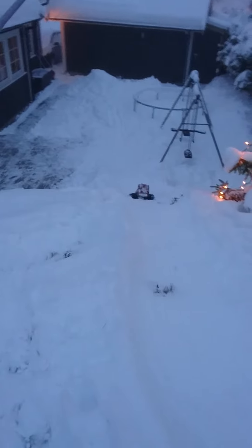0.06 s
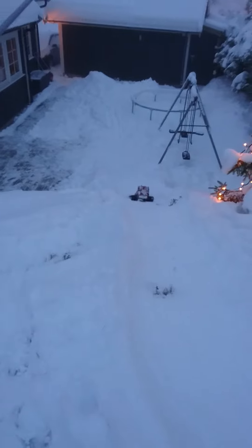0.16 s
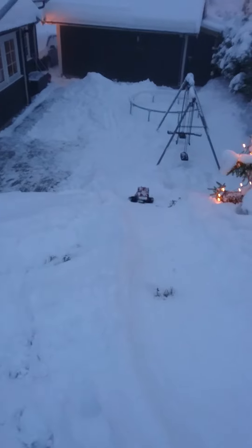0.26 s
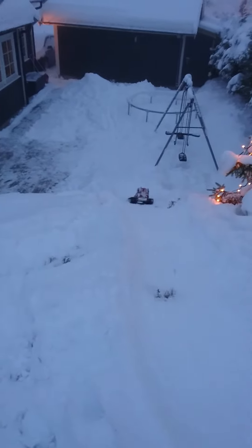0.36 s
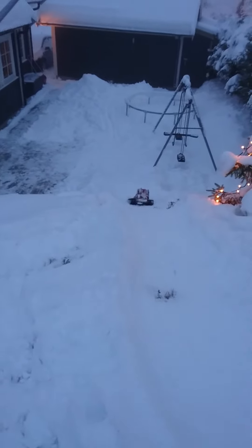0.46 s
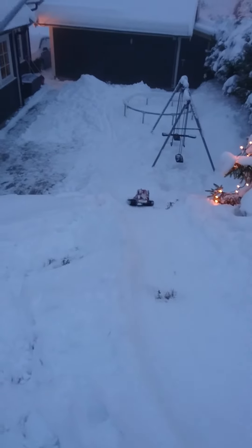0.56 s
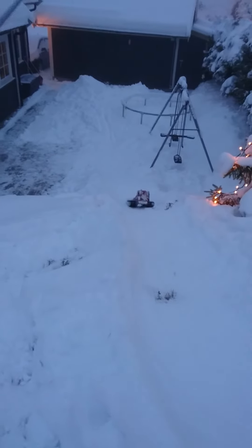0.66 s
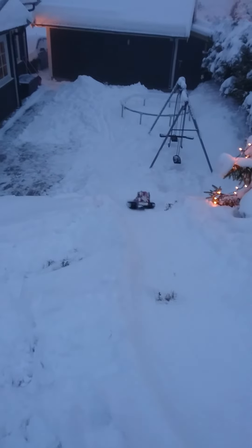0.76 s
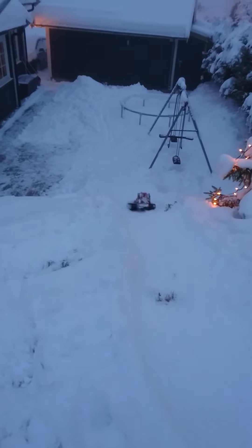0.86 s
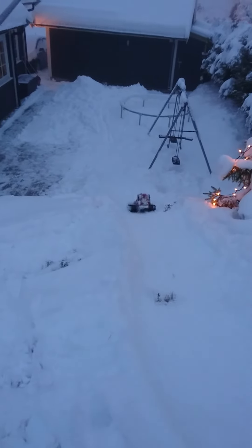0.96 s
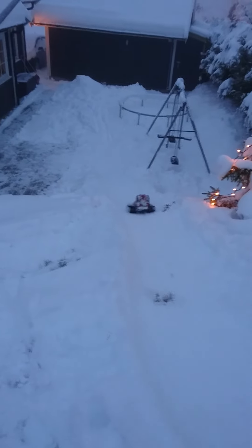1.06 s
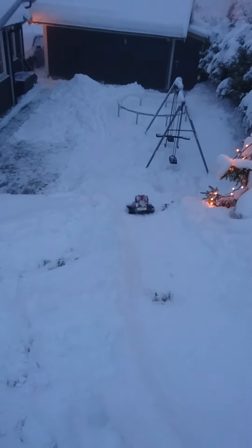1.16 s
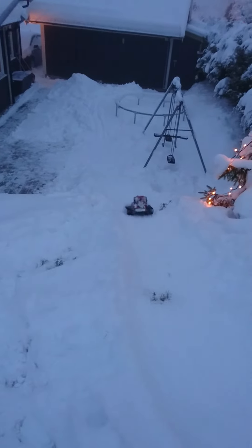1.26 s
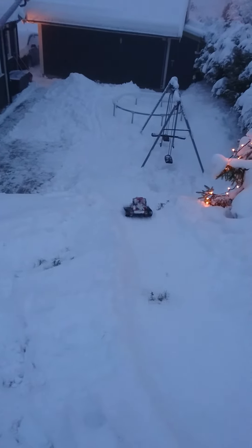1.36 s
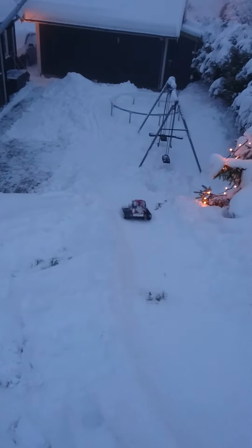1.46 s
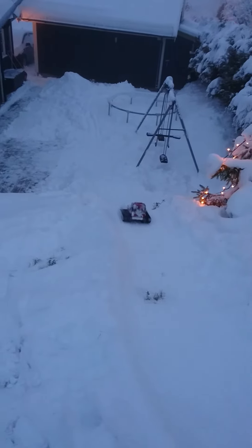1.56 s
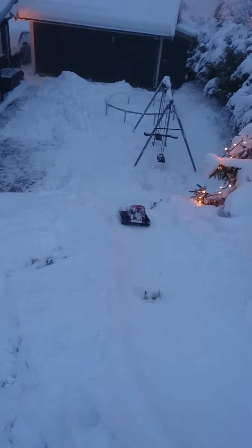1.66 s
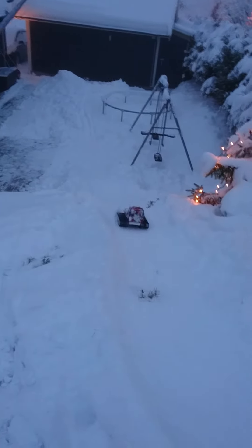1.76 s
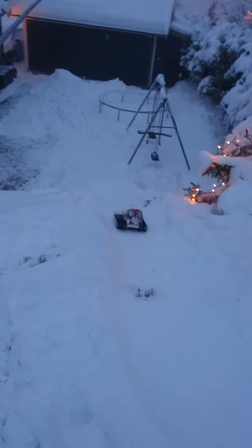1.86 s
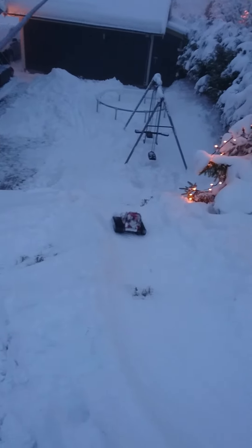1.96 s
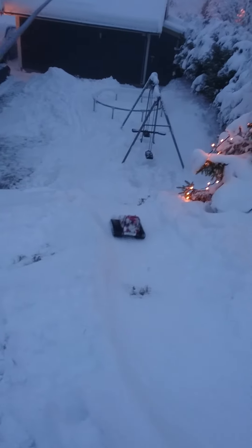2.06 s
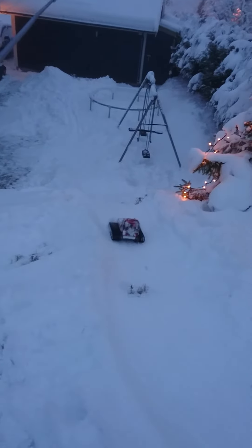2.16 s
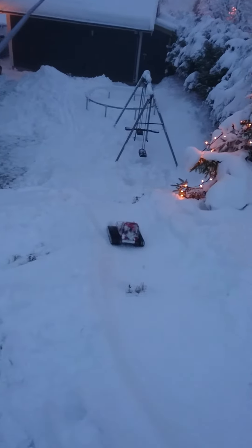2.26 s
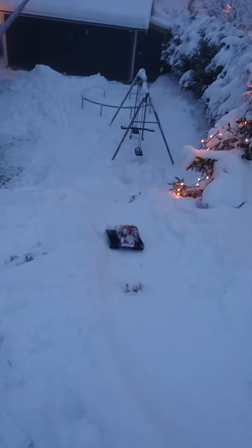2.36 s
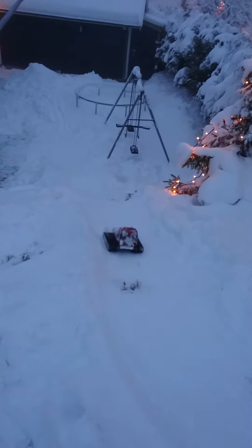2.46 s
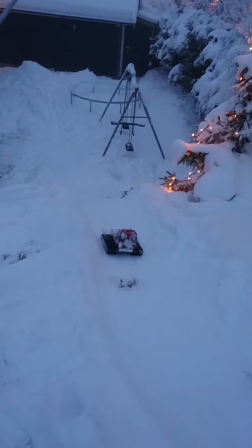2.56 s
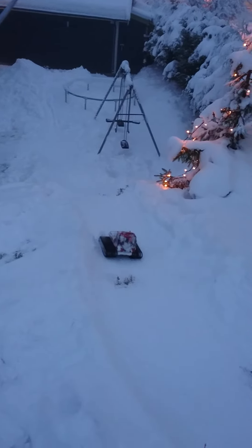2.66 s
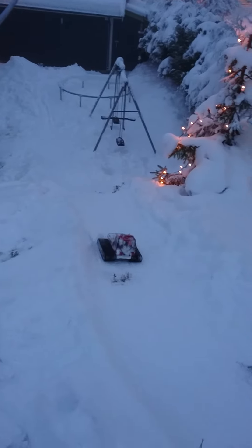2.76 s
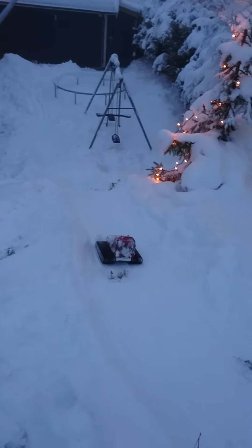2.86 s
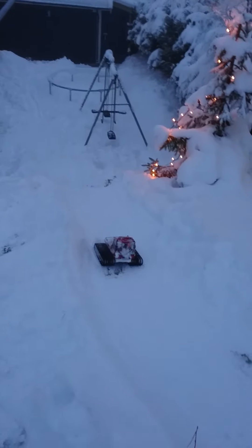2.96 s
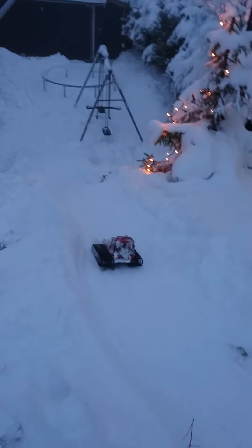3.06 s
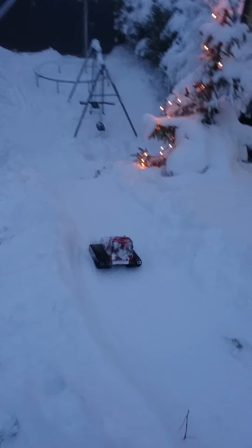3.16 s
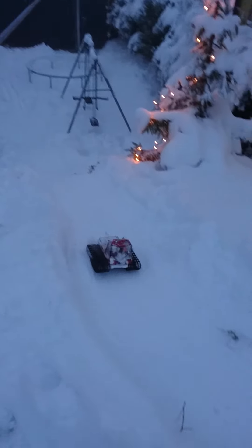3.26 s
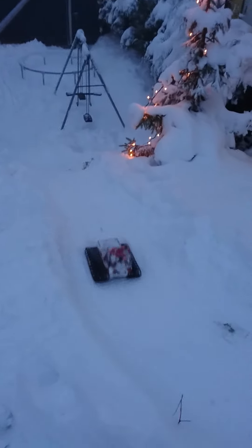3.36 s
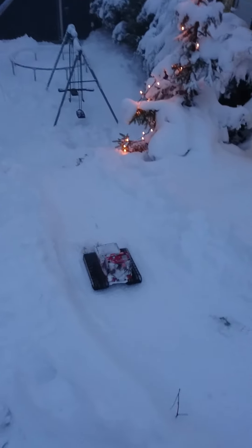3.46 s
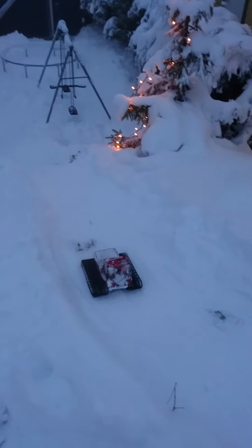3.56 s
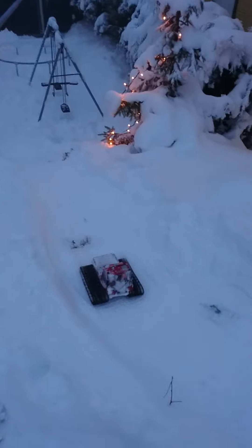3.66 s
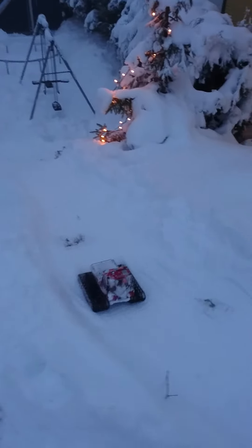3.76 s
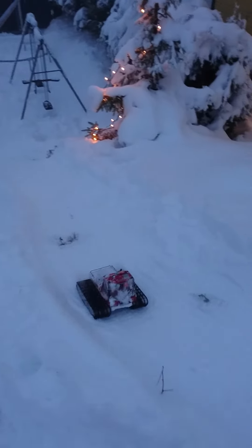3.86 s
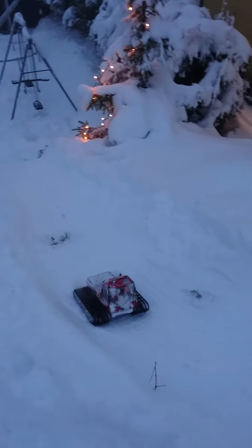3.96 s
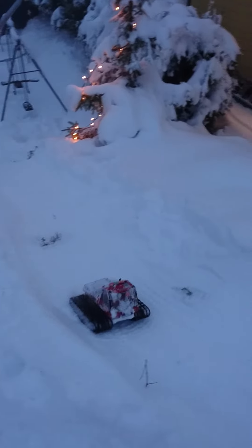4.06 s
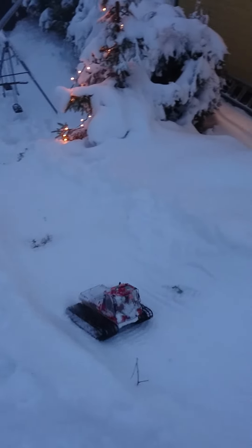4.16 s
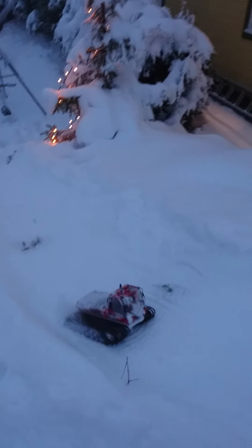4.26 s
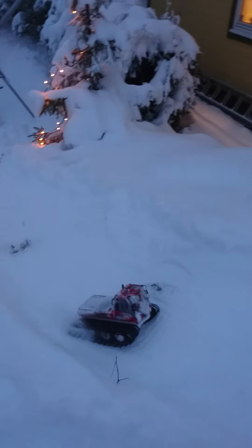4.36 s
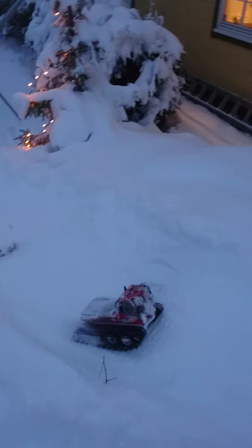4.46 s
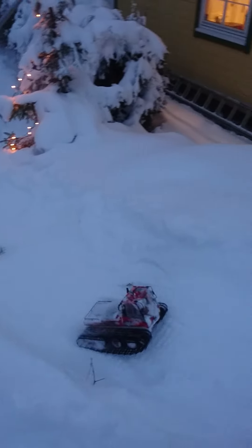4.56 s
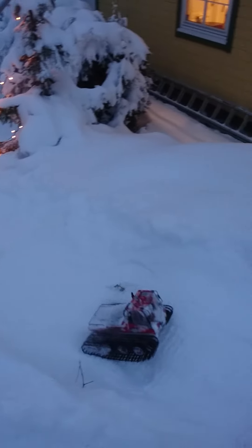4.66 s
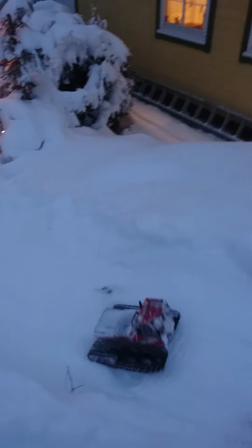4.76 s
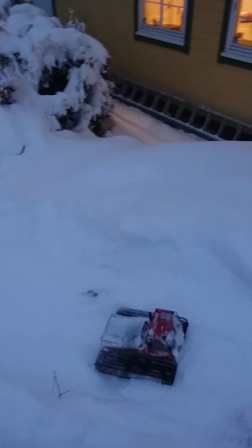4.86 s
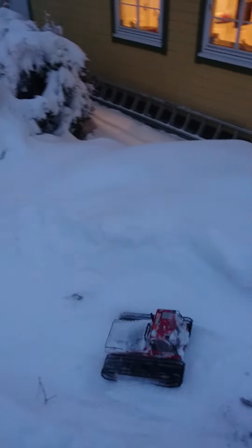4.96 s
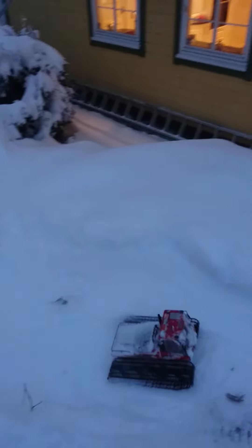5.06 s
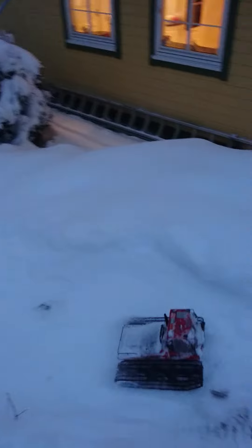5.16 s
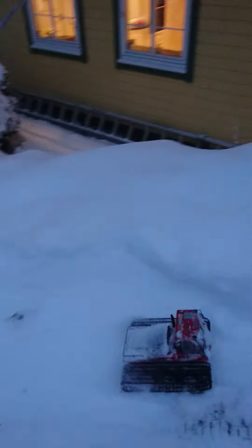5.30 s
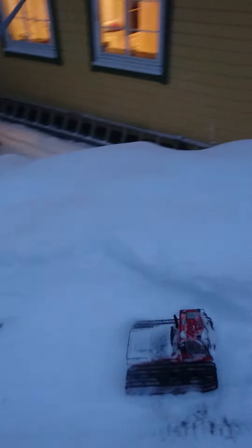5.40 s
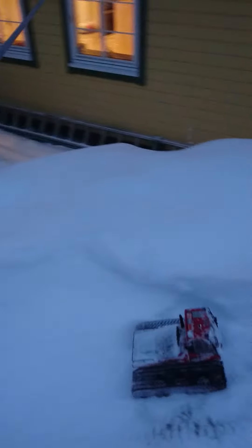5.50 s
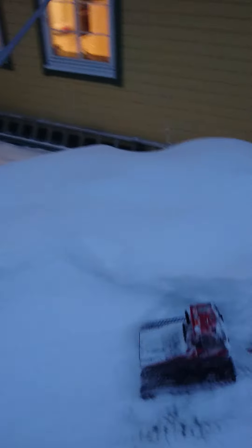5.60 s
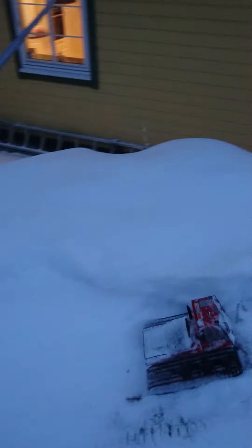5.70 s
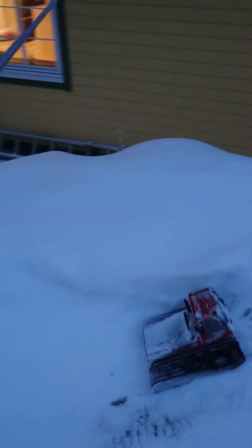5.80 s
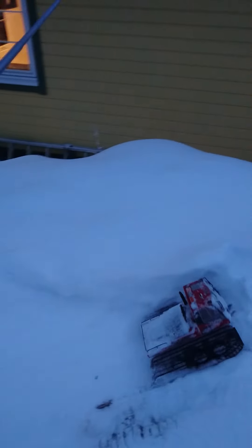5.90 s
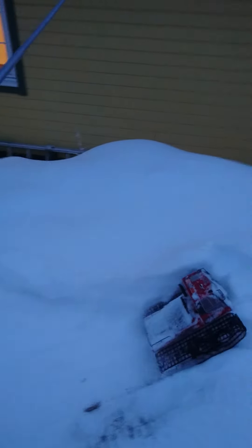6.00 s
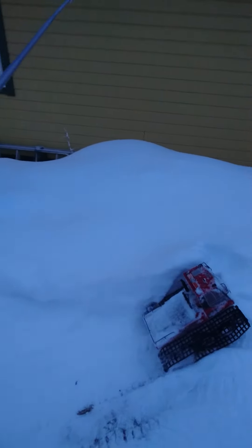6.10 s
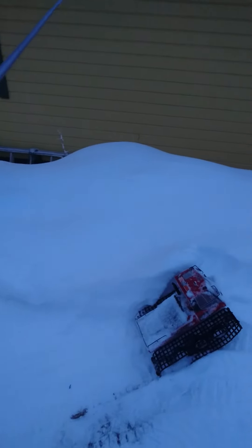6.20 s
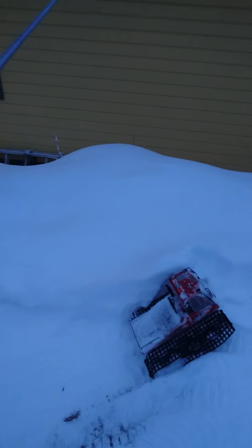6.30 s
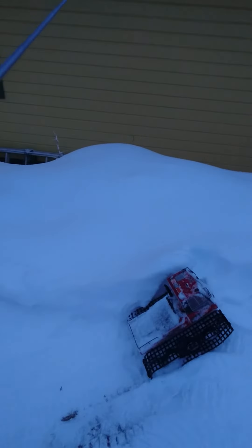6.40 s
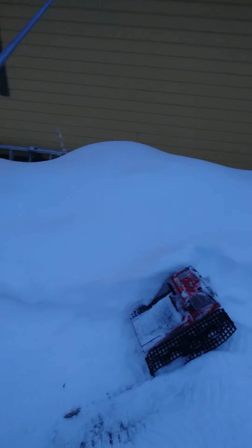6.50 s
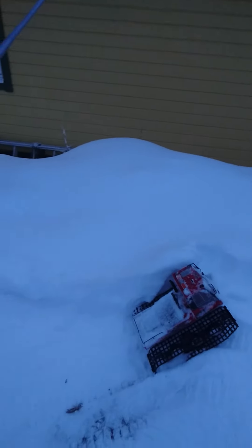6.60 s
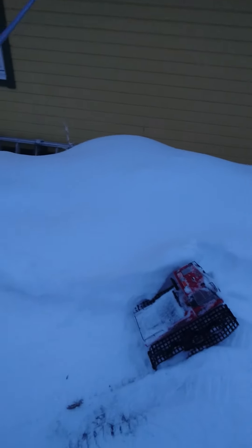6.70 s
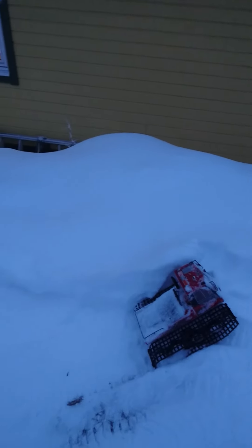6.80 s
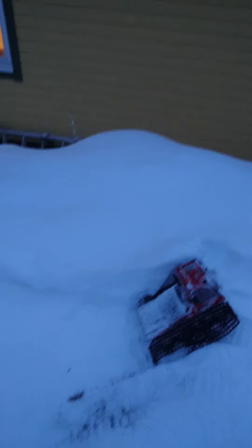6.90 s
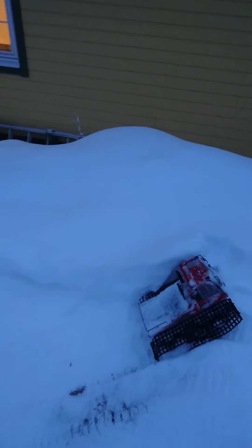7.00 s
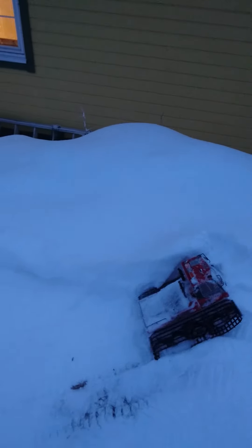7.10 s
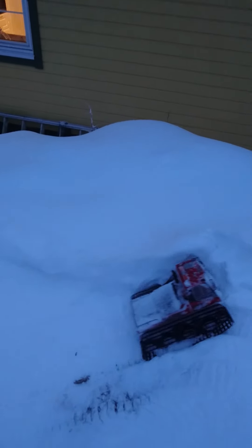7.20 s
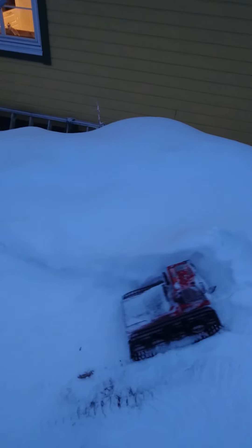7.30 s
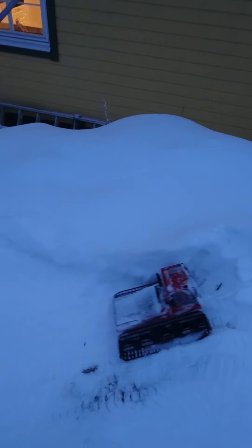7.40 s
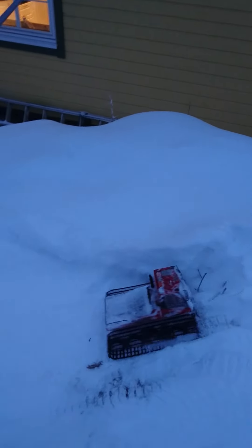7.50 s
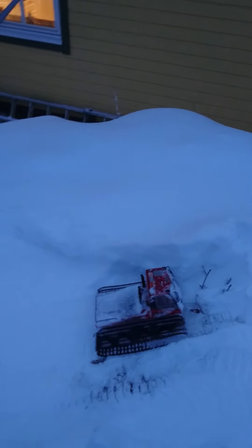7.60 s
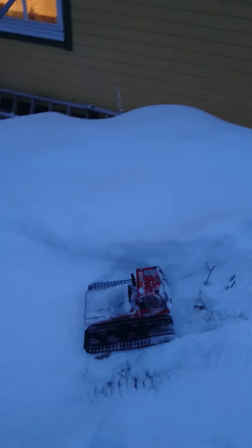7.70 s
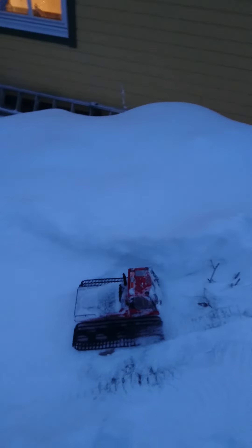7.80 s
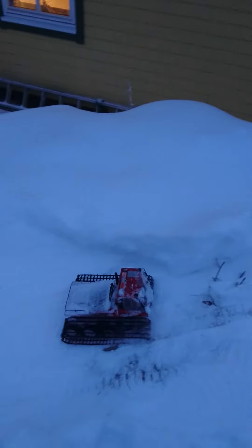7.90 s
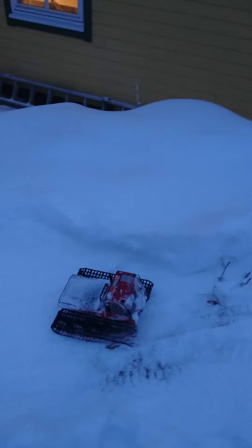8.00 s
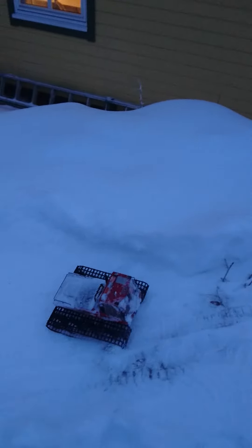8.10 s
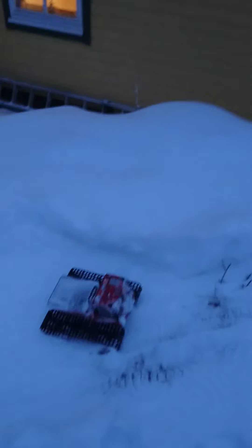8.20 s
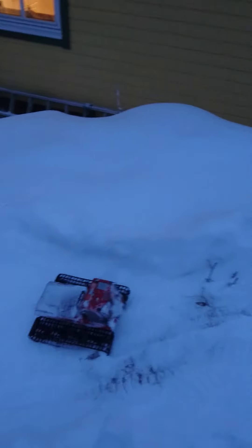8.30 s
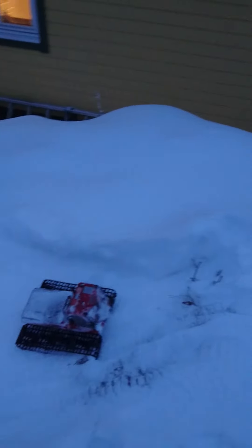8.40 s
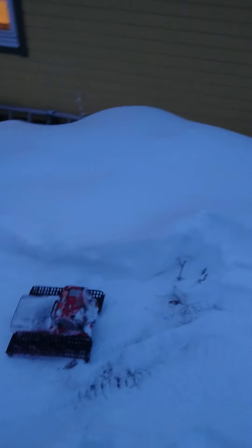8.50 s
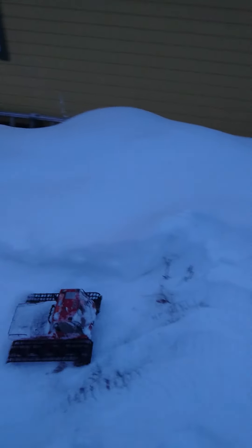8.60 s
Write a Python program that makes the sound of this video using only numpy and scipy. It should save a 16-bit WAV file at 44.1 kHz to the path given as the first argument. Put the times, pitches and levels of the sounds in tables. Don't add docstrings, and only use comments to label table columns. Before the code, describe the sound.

A handheld stereo microphone in open snowy air catches a toy-sized tracked vehicle coming nearer. Its shrill motor whine trembles and bends with effort over fine track chatter, strongest just before a sudden downward stall. Bumps and soft hiss fill the pause. A lower reversing whirr follows, buzzing and crackling with ice, slows to a halt, then a tiny restart ends it. Gloved knocks and scrapes are close and bassy throughout.

```python
import sys
import numpy as np
from scipy import signal
from scipy.fft import rfft, irfft, next_fast_len
from scipy.io import wavfile
from scipy.ndimage import uniform_filter1d, map_coordinates

SR = 44100
rng = np.random.default_rng(int(sys.argv[2]) if len(sys.argv) > 2 else 0)


def decibels_to_gain(level_db):
    exponent = np.asarray(level_db, float) / 20
    return 10 ** exponent


def transcribe(u):
    v = np.clip(np.atleast_2d(u).T, -1, 1)
    q = np.round(v * 32767).astype(np.int16)
    wavfile.write(sys.argv[1], SR, q)


N = 381465
TIME = np.arange(N) / SR


def rms_one(x):
    return x / np.sqrt(np.mean(np.abs(x) ** 2) + 1e-20)


def in_time(rows):
    s, *columns = np.transpose(rows)
    return [np.interp(TIME, s, c) for c in columns]


def response_db(table, hz, left=None):
    table_hz, db = np.transpose(table)
    return np.interp(np.log(hz), np.log(table_hz), db, left=left)


def hump(start_s, length_s):
    return np.sin(np.pi * np.clip((TIME - start_s) / length_s, 0, 1))


def gate(on_s, off_s, fade_in_s, fade_out_s):
    return np.clip(np.minimum((TIME - on_s) / fade_in_s, (off_s - TIME) / fade_out_s), 0, 1)


def bandpass(x, low_hz, high_hz, run=signal.sosfiltfilt):
    return run(signal.butter(2, [low_hz, high_hz], "band", fs=SR, output="sos"), x)


def coloured(spectrum, low_hz=10, high_hz=22000, channels=2):
    size = next_fast_len(N)
    hz = np.maximum(np.fft.rfftfreq(size, 1 / SR), 1)
    edges = 1 / np.sqrt((1 + (low_hz / hz) ** 8) * (1 + (hz / high_hz) ** 8))
    bins = rfft(rng.standard_normal((channels, size)))
    return rms_one(irfft(bins * decibels_to_gain(response_db(spectrum, hz, -70)) * edges, size)[:, :N])


def drift(rate_hz):
    r = np.exp(-2 * np.pi * rate_hz / SR)
    return rms_one(signal.lfilter([1], [1, -2 * r, r * r], rng.standard_normal(N + SR))[SR:])


def ring(clicks, hz, t60_s):
    r, w = decibels_to_gain(-60 / (t60_s * SR)), 2 * np.pi * hz / SR
    return signal.lfilter([0, np.sin(w)], [1, -2 * r * np.cos(w), r * r], clicks)


# t/s, f/Hz
CLIMB = [(0, 3420), (.54, 3364), (1.1, 3440), (1.17, 3310), (1.24, 3426), (1.5, 3540), (1.83, 3677),
         (2.14, 3630), (2.25, 3750), (2.75, 3695), (3.0, 3728), (3.3, 3598), (3.4, 3660), (3.52, 3740),
         (3.62, 3920), (3.71, 3717), (3.8, 3798), (3.9, 3740), (4.0, 3575), (4.11, 3360), (4.19, 3433),
         (4.25, 3270), (4.38, 3202), (4.45, 3343), (4.51, 3450), (4.6, 3533), (4.7, 3485), (4.74, 3353),
         (4.85, 3342), (4.92, 3558), (4.97, 3634), (5.02, 3617), (5.07, 3750), (5.125, 3508), (5.165, 3618),
         (5.33, 3615), (5.45, 3534), (5.55, 3457), (5.7, 3447), (5.86, 3420), (5.98, 3298), (6.04, 3202),
         (6.09, 3237)]
# t/s, load/dB, second multiple/dB
CLIMB_LOAD = [(0, -58.5, 2.5), (.2, -55.5, -4), (.33, -66, 6.5), (.44, -60, 3.5), (.52, -52.5, -6),
              (1.0, -49, -8), (1.42, -57, 1.5), (1.8, -54, -4), (2.6, -52, -5), (3.1, -50.5, 3),
              (3.22, -48.5, 0), (3.33, -60.5, 14), (3.42, -51.5, 3.5), (3.5, -44.5, -5.5), (3.619, -47, -8),
              (3.72, -42, -4), (3.85, -42.5, -7.5), (4.0, -42.5, -9), (4.2, -47.5, -2.5),
              (4.35, -51.5, 2.5), (4.46, -46.5, 1.5), (4.62, -45.5, 2.5), (4.7, -49, 6), (4.82, -46.5, 2.5),
              (4.89, -45.5, 3), (4.96, -35.5, -3), (5.04, -44, -3), (5.1, -34.5, -11), (5.14, -38, -4),
              (5.19, -32.5, -10.5), (5.33, -35.5, -7.5), (5.4, -39, -4.5), (5.7, -38, -4.5), (5.92, -40, 1),
              (6.05, -41, -10)]
# t/s, teeth f/Hz, load/dB, second multiple/dB, third multiple/dB
STALL = [(6.115, 3195, -44.5, -3, -10), (6.14, 2830, -42.5, 5, -18), (6.152, 2620, -43.5, 19, -18),
         (6.164, 2260, -48, 8, -10), (6.18, 1840, -40, -10, -18), (6.192, 1534, -50, 3, 0),
         (6.203, 1312, -60, 6, -1.5), (6.235, 850, -68, 10, -3)]
REVERSE = [(7.126, 450.2, -99, -3, 2), (7.19, 1950, -50, -11, -12), (7.204, 1918, -47, -10, -20),
           (7.221, 1655, -51, 5, -14), (7.243, 1423, -53.5, 12.5, -8), (7.266, 1625, -60.5, 11.5, -14),
           (7.298, 1930, -54.5, -5, -14), (7.308, 1991, -49, -20, 7), (7.328, 2079, -55.5, -7, -4),
           (7.36, 2085, -47.5, -14, -1.5)]
BACKING = [(7.398, 2170, -65, -3, 6), (7.44, 2120, -57, -8, 9), (7.481, 2168, -56, -12, -5),
           (7.545, 2290, -58, -8, -7), (7.642, 2186, -56, -12, -4), (7.7, 2215, -58, -10, -4),
           (7.77, 2304, -61, -8, 1), (7.83, 2136, -55.5, -18, -1.5), (7.9, 2145, -51, -3, -2)]
HALT = [(7.966, 2070, -49, -4, -9), (7.981, 1940, -43, -5.5, -15), (8.031, 1539, -47, 12, -8),
        (8.05, 1437, -52.5, 3, -8), (8.072, 1496, -49, 7.5, -11), (8.091, 1405, -54.5, 6, -4),
        (8.113, 1528, -49, 9, -6), (8.153, 1600, -49, 1, -8), (8.199, 1431, -59, 19, -8)]
STOP = [(8.22, 1200, -56, 8, -14), (8.236, 1036, -52, 21.6, -12), (8.252, 1025, -70, 12.5, -10),
        (8.269, 1032, -70, 18, -10), (8.289, 1000, -85, 8.7, -10)]
RESTART = [(8.6, 1960, -64, 2, -14), (8.606, 1990, -52.5, 0.5, -14), (8.63, 2064, -44, -3, -14),
           (8.638, 2140, -46, -13, -3), (8.65, 2250, -43.5, -8, -6)]
# t/s, share
SAG_EASES = [(3.45, 1), (4.9, 0.22), (6.1, 0.26)]
# t/s, distance/m
DISTANCE = [(0, 8.6), (.5, 8.1), (.8, 6.8), (1.25, 8.1), (1.8, 6.7), (2.6, 6.07), (2.9, 4.9), (3.35, 4.7),
            (3.7, 3.54), (4.2, 3.83), (5.0, 3.54), (6.1, 3.08), (7.3, 4.02), (8.2, 2.91), (8.65, 3.1)]
# f/Hz, level/dB
GEARBOX = [(1500, -0.5), (2150, -10.5), (3000, -2.5), (3900, 6), (5300, -17.5), (6300, 2.5), (7500, 3.5),
           (10300, -20.5)]


def drive():
    sprocket_teeth, tight_spot_turns = 433, 0.01
    sag, sag_sharpness, sag_db = 0.0105, 0.29, (0, 2, 0, 0)
    spin_up_s, creep_s = 0.023, 0.13
    third_db, fourth_db, light_load_db, loss_db_per_m = 9.5, -3, -4, 1.2

    bursts = (STALL, REVERSE + BACKING + HALT + STOP, RESTART)
    steady_hz, = in_time(CLIMB + [row[:2] for burst in bursts for row in burst])
    turn = 2 * np.pi * (np.cumsum(steady_hz) / SR / sprocket_teeth - tight_spot_turns)
    bind = np.cos(turn) + sag_sharpness * np.cos(2 * turn)
    bind = bind * in_time(SAG_EASES)[0] * decibels_to_gain(0.69 * drift(3.14))
    mesh_hz = steady_hz * (1 - sag * bind)

    loads = [(s, load, second, second) for s, load, second in CLIMB_LOAD]
    loads += [(s, *levels) for burst in bursts for s, _, *levels in burst]
    load_db, second_facing_db, third_facing_db = in_time(loads)

    starts = [0, REVERSE[0][0], RESTART[0][0]]
    stops = [STALL[-1][0], STOP[-1][0], N / SR]
    off_points, rest_points = [], []
    for a, b, last in zip(starts, stops, [-1, *stops]):
        off_points += [(a - spin_up_s, 1), (a, 0), (b, 0), (b + spin_up_s, 1)]
        rest_points += [(a - creep_s, a - creep_s - last), (a, 0), (b, 0)]
    off, = in_time(off_points)
    rest_s, = in_time(rest_points)

    loss_db = loss_db_per_m * in_time(DISTANCE)[0]
    backing_db = light_load_db * (TIME > STALL[0][0])
    shares_db = (0, second_facing_db, third_facing_db + third_db - loss_db, fourth_db - loss_db + backing_db)
    levels_db = []
    for k, (share_db, bind_db) in enumerate(zip(shares_db, sag_db), 1):
        radiated_db = response_db(GEARBOX, k * mesh_hz)
        levels_db.append(load_db + bind_db * bind + share_db - 50 * off + radiated_db)
    return 2 * np.pi * np.cumsum(mesh_hz) / SR, levels_db, np.log2(steady_hz / 3500), rest_s


PINION_TEETH, WHEEL_TEETH = 17, 43
# t/s, share
ROUGHNESS = [(0, .7), (1.2, .75), (2.0, 1.2), (3.2, 1.1), (3.3, .7), (3.42, .7), (3.5, 1.1), (4.6, 1.2),
             (4.75, .9), (5.0, .8), (5.33, .8), (5.42, 1.15), (5.55, .95), (6.0, 1.05), (6.2, 1.8),
             (7.1, .7), (7.5, .6), (7.8, .4), (7.95, .45), (8.05, .7), (8.65, .6)]
# t/s, speed ratio to the first, level to the first/dB
OTHER_TRACK = [(0, 1.07, -6), (1.5, 0.93, -6.5), (2.2, 0.78, -20), (3.0, 0.99, -1.5), (3.9, 1.12, -21),
               (4.25, 1.3, -5), (4.45, 1.18, -8), (4.62, 1.08, -5), (4.7, 1.18, 3), (4.76, 1.2, -8),
               (4.88, 1.17, -1), (4.95, 0.87, -20), (5.1, 0.9, -17), (5.35, 1.03, -9), (5.5, 1.02, -4.5),
               (5.7, 1.055, 0), (5.8, 1.08, -6), (6.0, 0.9, -7.5), (6.12, 0.95, -40), (8.65, 1.0, -40)]


def gears(teeth, levels_db):
    second_stage_db, climb_spread = -56, 0.5
    rough, = in_time(ROUGHNESS)
    ratio, other_db = in_time(OTHER_TRACK)
    other_db = other_db + 6 * np.array([[1], [-1]])
    slip = np.cumsum((ratio - 1 + 0.015 * drift(4.0)) * np.gradient(teeth))
    climbing = TIME < STALL[0][0]
    out = 0
    for motor_db, heard, lead in ((2.5, levels_db, 0), (other_db, levels_db[:1], slip)):
        mesh = teeth + lead
        pinion, wheel = mesh / PINION_TEETH, mesh / WHEEL_TEETH
        links = np.sin(wheel / 4 + 1.83 * drift(2.6))
        wobble = links + 1.1 * drift(25.0) + 0.48 * np.sin(wheel) + 0.5 * np.sin(wheel / 2)
        runout = 0.3 * np.exp(1j * pinion) * decibels_to_gain(3.0 * drift(13.45))
        runout = runout + 0.16 * np.cos(wheel + 1) + 0.086 * np.cos(wheel / 2)
        for k, level_db in enumerate(heard, 1):
            tooth_error = 0.17 * drift(40 * k) + 0.5 * uniform_filter1d(drift(340), size=30)
            envelope = 1 + runout + rough * np.sqrt(k) * tooth_error
            tremble = rough * wobble * (1 + climb_spread * (k > 2) * climbing)
            line = np.real(envelope * np.exp(1j * k * (mesh + tremble)))
            out = out + decibels_to_gain(motor_db) * decibels_to_gain(level_db) * line
    stage = np.sin(teeth * PINION_TEETH / WHEEL_TEETH + 1.57 * drift(46.0))
    side_on = np.clip((TIME - 4.3) / 0.23, 0, 1) * (TIME < REVERSE[0][0])
    return out + decibels_to_gain(np.minimum(levels_db[0] - 5, second_stage_db)) * stage * side_on


# level at 1 m/dB, extra loss/dB per m, speed/dB per octave, fade at rest/dB per root s
RATTLE = [(-38, 2.03, 8, 61.5), (-45.5, -1, 28, 25), (-28.5, 3, 5.5, 44)]
# f/Hz, density/dB per Hz
RATTLE_COLOUR = [(300, 3.5), (600, 5), (1400, -0.5), (2300, -1.5), (3200, 4), (4000, 9.5), (4750, 9.5),
                 (5600, 9), (7000, 8.5), (8200, -7.5), (10000, -3.5), (12000, -12.5), (14800, -12.5),
                 (16000, -3)]
# t/s, length/s, depth/dB
EASES = [
    (0.29, 0.2, 7.5),
    (3.262, 0.18, 2.5),
    (4.702, 0.31, 2),
]


def rattle(teeth, octaves, rest_s):
    wheel = teeth / WHEEL_TEETH
    metres, = in_time(DISTANCE)
    kick_db = 0.25 * np.cos(wheel) + 0.4 * np.cos(wheel / 2) + 0.79 * drift(7.5)
    kick_db = kick_db - sum(db * hump(s, length) for s, length, db in EASES)
    ranges = [(4.5, 300, 4300, 0.6), (-5.0, 5250, 7800, 0.95), (0, 7800, 22000, 0.95)]
    out = 0
    for (db, loss_db, octave_db, fade_db), (trim_db, low_hz, high_hz, own) in zip(RATTLE, ranges):
        level_db = db - 20 * np.log10(metres) - loss_db * metres + octave_db * octaves
        level_db = level_db - fade_db * np.sqrt(rest_s) + trim_db + 5.0
        chance_db = 0.33 * drift(8.7) + 1.8 * drift(115.0)
        a, b = coloured(RATTLE_COLOUR, low_hz, high_hz) * decibels_to_gain(level_db + kick_db + chance_db)
        out = out + np.array([np.sqrt(1 - own ** 2) * a + own * b, a])
    return out


# f/Hz, width/Hz, added gain
CHASSIS = [(1620, 954, 0.99), (2920, 210, 0.28), (4790, 320, -0.26), (5630, 740, 0.1), (1680, 120, -0.055),
           (7630, 400, -0.75),
           (4600, 600, -.35), (8050, 300, -.4), (13100, 1100, -.5)]


def chassis(x):
    for hz, width_hz, gain in CHASSIS:
        x = x + gain * signal.lfilter(*signal.iirpeak(hz, hz / width_hz, fs=SR), x)
    return x


# t/s, ahead -1 to alongside +1
BEARING = [(0, -1.01), (1, -0.95), (2.6, -0.6), (3.3, -0.36), (4, -0.14), (5, 0.62), (6.2, 0.8), (7, 0.41),
           (8.65, 0.43)]
# t/s, length/s, depth/dB, right port deeper/dB
SHADOWS = [
    (0.217, 0.28, 5.5, 15.5),
    (3.15, 0.75, 8.5, 13),
]


def at_ports(near, right):
    bearing, = in_time(BEARING)
    direct_lag = -0.084 + 5.52 * bearing
    subtracted_lag = -4.5 + 4.88 * bearing
    subtracted_share = 0.35 - 0.17 * bearing
    body_db, top_db = -14 + 0.5 * bearing, -3 - 9.5 * bearing

    def lagged(lag):
        return map_coordinates(near, [np.arange(N) - lag], order=3, mode="nearest")

    left = (1 - subtracted_share) * lagged(direct_lag) - subtracted_share * lagged(subtracted_lag)
    r, w = np.exp(-np.pi * 600 / SR), 2 * np.pi * 1800 / SR
    left = signal.lfilter([r * r, -2 * r * np.cos(w), 1], [1, -2 * r * np.cos(w), r * r], left)
    pair = np.array([decibels_to_gain(6.0) * left, right])

    cover = np.array([gate(s, s + length, 0.05, 0.16) for s, length, *_ in SHADOWS])
    shade_db, uneven_db = np.array(SHADOWS)[:, 2:].T @ cover
    shaded_mid = bandpass(pair, 4170, 7390) * (decibels_to_gain(-shade_db) - 1)
    shaded_top = bandpass(pair, 6600, 15600) * (decibels_to_gain(-0.4 * shade_db) - 1)
    pair = pair + shaded_mid + shaded_top
    top_db = top_db + uneven_db

    body, top = bandpass(pair, 2050, 6100), bandpass(pair, 6150, 12600)
    half = np.array([[0.5], [-0.5]])
    return pair + body * (decibels_to_gain(half * body_db) - 1) + top * (decibels_to_gain(half * top_db) - 1)


# t/s, level/dB
HANDLING = [(0.0, -64.5), (0.84, -57), (2.02, -64), (3.54, -56), (5.37, -51.5), (6.12, -51), (6.46, -68.5),
            (6.94, -63.5), (7.61, -59.5), (8.02, -51), (8.53, -58.5), (8.65, -53)]
# f/Hz, density/dB per Hz
HANDLING_COLOUR = [(21, -57), (35, 1), (86, -1.5), (150, -4.5), (225, -5.5), (312, -10), (469, -14.5),
                   (900, -24), (1170, -65), (1980, -120)]
# t/s, level/dB
DEEP_RUMBLE = [(0, 1), (.7, 2), (2.6, -1.5), (3.3, 3), (4.3, -3.5), (5.8, -6), (6.3, 2), (7.3, 5.5), (7.8, 0),
               (8.1, -3), (8.65, 0)]
# t/s, length/s, level/dB
SCRAPES = [
    (0.266, 0.063, -53),
    (0.503, 0.065, -49.5),
    (1.029, 0.05, -58.5),
    (1.181, 0.081, -51),
    (3.874, 0.1, -47),
    (6.727, 0.029, -64),
]


def handling():
    lumps_db = 1.8 * drift(9) + 1.8 * drift(22)
    rumble = coloured(HANDLING_COLOUR, 31, 1306) * decibels_to_gain(in_time(HANDLING)[0] + lumps_db)
    deep = signal.sosfiltfilt(signal.butter(2, 100, fs=SR, output="sos"), rumble)
    mid, side = rumble + deep * (decibels_to_gain(in_time(DEEP_RUMBLE)[0]) - 1)
    stroke = sum(decibels_to_gain(db) * hump(s, length) for s, length, db in SCRAPES)
    grit_colour = [(60, 5.0), (200, -6.5), (500, -11.0), (1200, -15.5), (2500, -28), (8000, -36.0)]
    grit = coloured(grit_colour) * stroke * decibels_to_gain(4.8 * drift(240))
    pair = np.array([mid + 0.5 * side + grit[0] + 0.5 * grit[1], mid + grit[0]])
    return pair * decibels_to_gain(np.array([[-3.5], [3.1]]))


# f/Hz, density/dB per Hz
HUSH = [(290, -44), (500, -13.5), (1630, -15.5), (4900, -3), (6740, 4.5), (7780, -8), (9670, -10),
        (10100, -13), (11700, -11), (15800, -9.5)]
# f/Hz, level/dB
HUSH_BALANCE = [(400, 1), (1300, -7), (6000, -19), (14000, -5.5)]


def hush():
    tilted = [(hz, db + np.interp(hz, *np.transpose(HUSH_BALANCE))) for hz, db in HUSH]
    left = decibels_to_gain(-0.5) * coloured(tilted, channels=1)[0]
    right = decibels_to_gain(2.5) * coloured(HUSH, channels=1)[0]
    return decibels_to_gain(-63) * np.array([left, right])


# t/s, contact/dB, push/dB, ring f/Hz, contact edge/dB
KNOCKS = [(.7617, -32, -46, 74.8, -12), (.8067, -32.5, -28.5, 96, 6), (.9093, -29.5, -30, 174, -12),
          (1.2284, -41, -28.5, 77, 6), (2.2349, -29.5, -27.5, 98.1, 3.5), (3.3022, -20, -38, 86, -18),
          (3.5815, -29.5, -30.5, 99.3, 3.5), (3.7735, -22, -25, 107.5, -3), (4.6237, -63, -38, 91.9, 0),
          (4.8824, -47, -32.5, 356, 0), (5.2454, -30.5, -34, 190, 1), (5.2969, -29, -37.5, 320.8, -1),
          (5.6882, -50, -30, 332, 2), (6.1844, -33.5, -44.5, 139.8, -3.5), (7.182, -33.5, -32, 105, 0),
          (7.758, -23, -31, 91.6, -5), (8.3152, -28.5, -37, 299, -7.5), (8.536, -30.5, -32.5, 252.3, -6),
          (.7003, -37, -36.5, 94, -8), (2.8615, -46, -44.5, 128.6, -6), (3.4698, -40, -37.5, 99, -10),
          (1.8896, -58, -46.5, 148.4, 0)]
# t/s, push/dB, ring f/Hz
NUDGES = [(0.292, -40.5, 106), (0.58, -32, 96), (1.353, -39.5, 85), (1.5376, -39.5, 123),
          (1.741, -45.5, 80.3), (1.846, -48.5, 110), (2.35, -43.5, 95.2), (3.255, -35.5, 54),
          (4.477, -42.5, 90), (4.997, -45, 116.8), (1.002, -49, 321), (.672, -48.5, 122),
          (3.054, -37.5, 92), (3.1184, -44, 180.1), (4.2401, -33, 87.9), (6.5518, -51.5, 77.6),
          (6.6565, -32, 162), (6.736, -37, 124), (6.908, -35.5, 95.5), (7.0558, -45.5, 86.96),
          (7.9136, -38, 62.9), (7.963, -42, 88.7), (7.7578, -32.5, 387.4), (8.3164, -25.5, 135)]


def knocks():
    nudge_contact_db, pan_db, pan_db_per_octave = -19, -13, -5
    dive_hz, dive_s = 110, 0.0026
    length = 5000
    out = np.zeros((2, N + SR))
    hits = KNOCKS + [(s, db + nudge_contact_db, db, hz, -6.0) for s, db, hz in NUDGES]
    chance = rng.standard_normal((len(hits), length))
    padded = signal.butter(2, 520, fs=SR, output="sos")
    unit, age = np.eye(1, length)[0], np.arange(length) / SR
    shell = 0.63 * ring(unit, 319, 0.026) - 0.23 * ring(unit, 167, 0.077)
    for (s, click_db, push_db, hz, edge_db), noise in zip(hits, chance):
        swell = 1 - np.exp(-age * hz / 0.5)
        dive = 2 * np.pi * (0.949 * hz * age + dive_hz * dive_s * (1 - np.exp(-age / dive_s)))
        thud = -1.3 * np.sin(dive) * decibels_to_gain(-60 * age / (2.68 / hz + 0.029)) * swell
        thud = signal.sosfilt(padded, thud + np.clip(hz / 170, 0, 1) ** 1.45 * shell)
        scuff = rms_one(ring(ring(noise, 143, 0.009), 105, 0.013))
        scuff = 0.1 * (1 - age / age[-1]) * scuff * np.exp(-age / 0.068) * (1 - np.exp(-age / 0.0018))
        edge = ring(unit, 2200, 0.0013) + 0.1 * noise * np.exp(-age / 0.0004)
        click = decibels_to_gain(edge_db) * edge + 0.32 * ring(unit, 814, 0.006)
        left_db = 1.9 * pan_db + pan_db_per_octave * np.log2(hz / 150) + 7.0
        sides = decibels_to_gain(np.array([[left_db], [2.5]]))
        hit = decibels_to_gain(push_db + 9.5) * (thud + scuff) * sides + click * decibels_to_gain(click_db + 8.0) * np.sqrt(sides)
        start = round(s * SR)
        out[:, start:start + length] += hit
    return out[:, :N]


# t/s, peak/dB
SNAPS = [(3.581, -48), (3.918, -34), (6.1673, -35), (7.181, -30), (7.4446, -33), (7.352, -33), (7.392, -33),
         (7.515, -35), (7.549, -33), (8.081, -37), (8.305, -45), (8.3155, -41), (2.9, -42), (0.511, -48),
         (0.707, -44), (7.569, -38), (5.8, -38), (4.251, -37), (7.488, -35), (7.7101, -33), (7.886, -36),
         (7.9696, -36), (8.0297, -41), (8.0493, -31), (8.1147, -33), (8.1296, -31), (8.1479, -32),
         (8.196, -38), (8.208, -41), (8.2208, -43), (8.536, -37.5), (6.837, -48), (6.656, -55),
         (8.604, -46), (8.289, -46)]


def snaps():
    at_s, db = np.transpose(SNAPS)
    starts = np.zeros(N)
    starts[np.round(at_s * SR).astype(int)] = decibels_to_gain(db - 1.0)
    cracks = signal.lfilter([1], [1, -np.exp(-1 / (0.0031 * SR))], starts) * rng.standard_normal(N)
    return bandpass(cracks, 4800, 12000, signal.sosfilt) + 0.79 * ring(cracks, 6930, 0.0053) * 0.25


# on t/s, off t/s, f/Hz, level/dB
HUMS = [
    (1.3, 4.1, 473, -65),
    (7.09, 8.2, 990, -69),
    (7.08, 7.18, 2940, -72),
    (7.12, 8, 1990, -74),
]


def hums():
    shiver = 4.96 * drift(3.1)
    out = 0
    for on_s, off_s, hz, db in HUMS:
        out = out + decibels_to_gain(db) * np.sin(2 * np.pi * hz * TIME + shiver) * (TIME > on_s) * (TIME < off_s)
    return out


def cover_buzz():
    buzz = rms_one(ring(rng.standard_normal(N), hz=2900, t60_s=0.012))
    level = gate(7.27, 7.95, 0.023, 0.023) * decibels_to_gain(-55 + 3.65 * drift(11))
    return buzz * level * np.array([[0.6], [1.3]])


def snow_slide():
    hiss = coloured([(3000, -2), (7000, 10.0), (12000, -14.0)], low_hz=4000, high_hz=9000)
    return hiss * gate(8.24, 8.62, 0.04, 0.04) * decibels_to_gain(-57 + 2.0 * drift(19.5))


def scene():
    teeth, levels_db, octaves, rest_s = drive()
    source = gears(teeth, levels_db) + snaps() + rattle(teeth, octaves, rest_s)
    vehicle = at_ports(*chassis(source))
    return vehicle + hums() + knocks() + handling() + hush() + cover_buzz() + snow_slide()


def band_limit(x):
    return signal.sosfilt(signal.butter(12, 15850, fs=SR, output="sos"), x)


def record(dry):
    rumble_cut = signal.butter(4, 46, "high", fs=SR, output="sos")
    top_cut = signal.cheby2(10, 60, 16700, fs=SR, output="sos")
    mix = signal.sosfilt(np.vstack([rumble_cut, top_cut]), dry) - 0.001
    return band_limit(mix)


dry = scene()
out = record(dry)
transcribe(out)
```